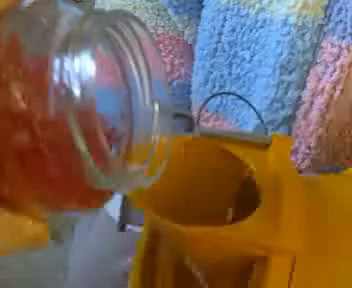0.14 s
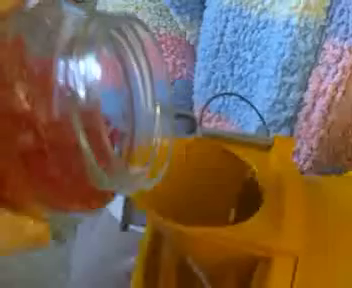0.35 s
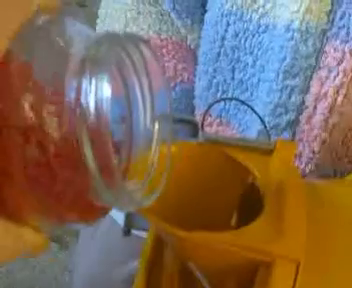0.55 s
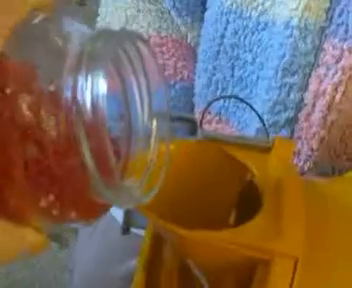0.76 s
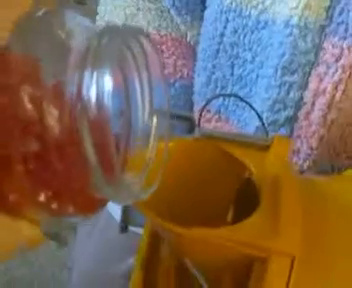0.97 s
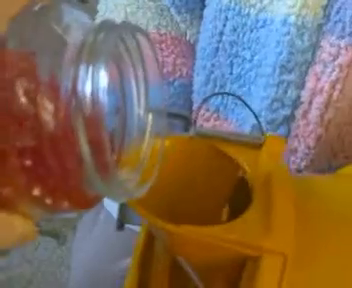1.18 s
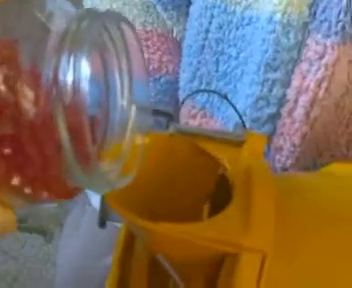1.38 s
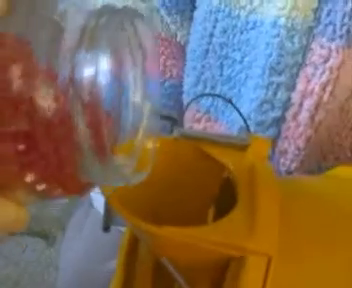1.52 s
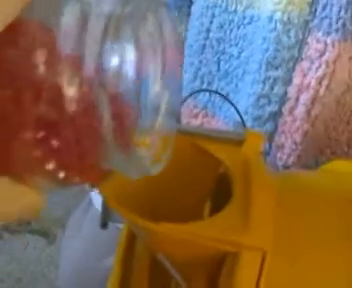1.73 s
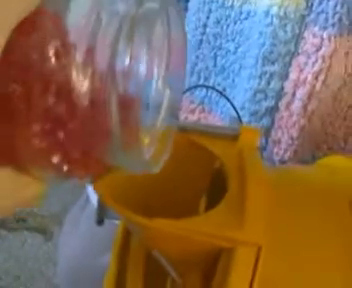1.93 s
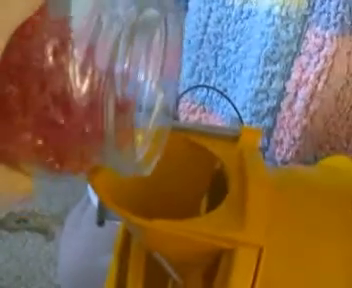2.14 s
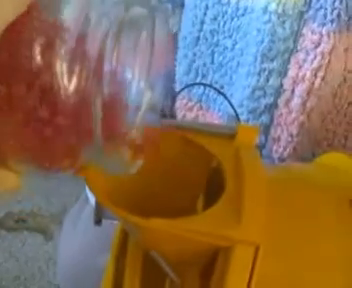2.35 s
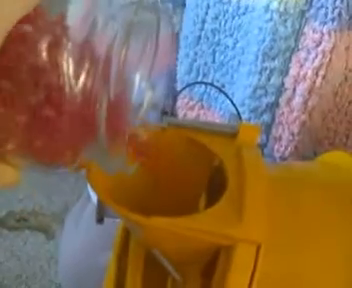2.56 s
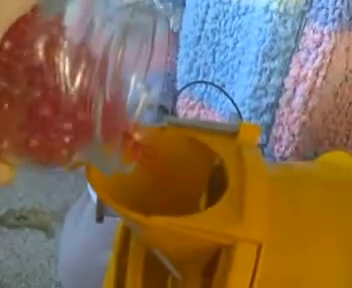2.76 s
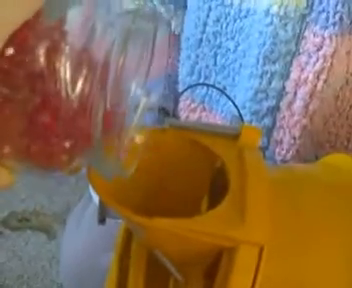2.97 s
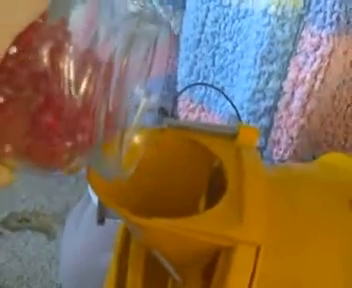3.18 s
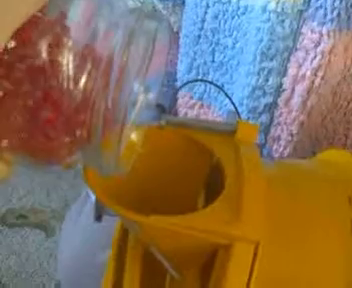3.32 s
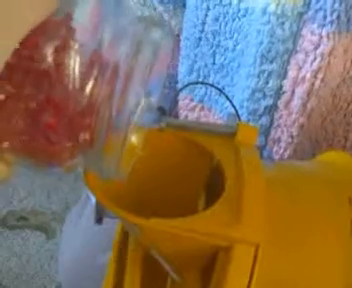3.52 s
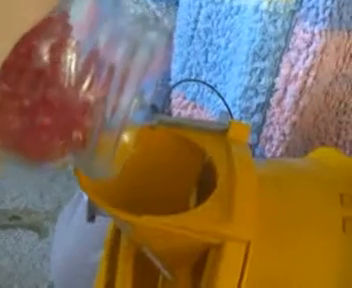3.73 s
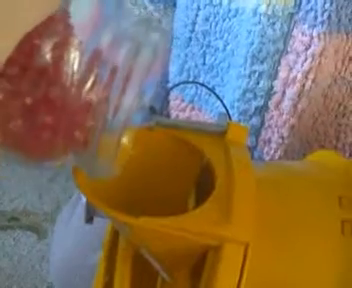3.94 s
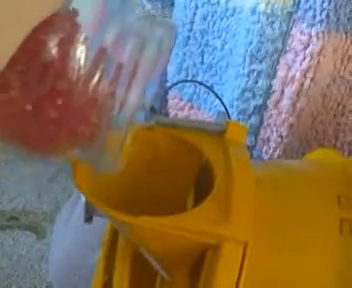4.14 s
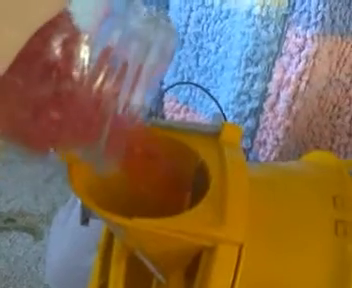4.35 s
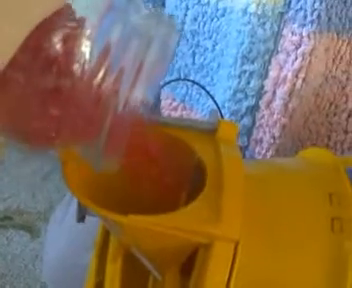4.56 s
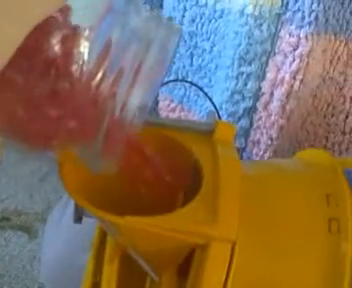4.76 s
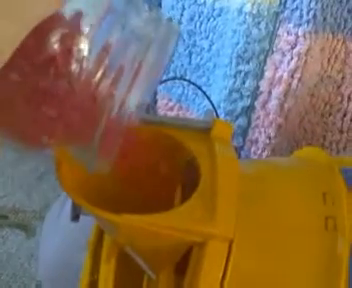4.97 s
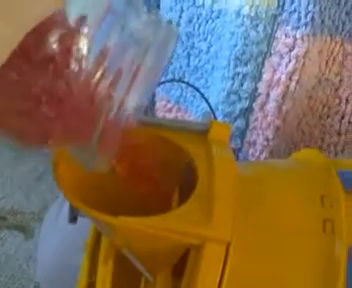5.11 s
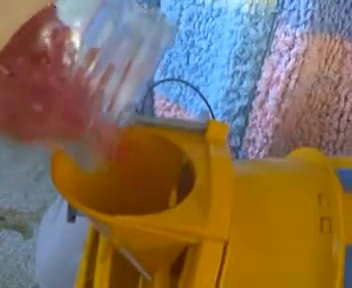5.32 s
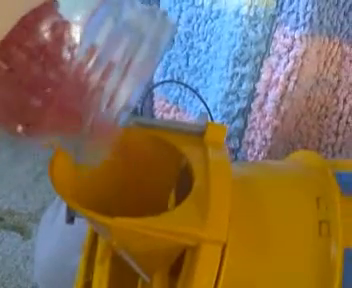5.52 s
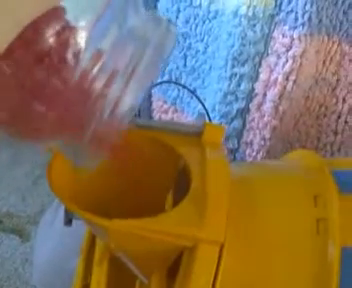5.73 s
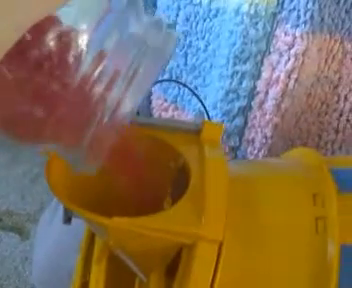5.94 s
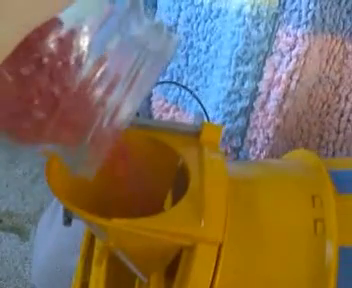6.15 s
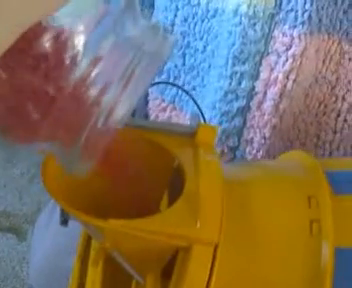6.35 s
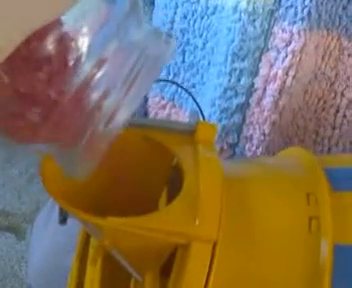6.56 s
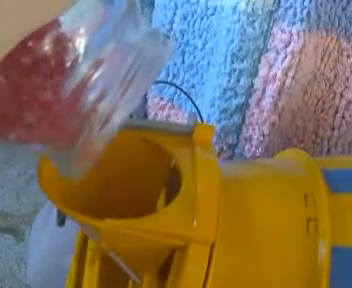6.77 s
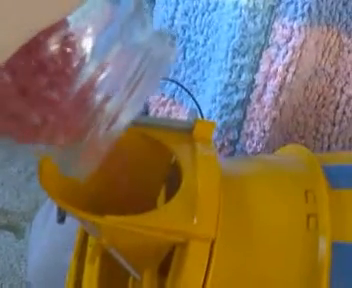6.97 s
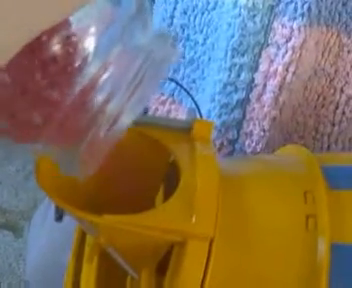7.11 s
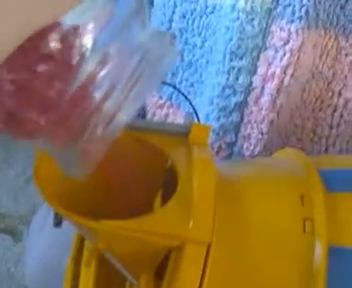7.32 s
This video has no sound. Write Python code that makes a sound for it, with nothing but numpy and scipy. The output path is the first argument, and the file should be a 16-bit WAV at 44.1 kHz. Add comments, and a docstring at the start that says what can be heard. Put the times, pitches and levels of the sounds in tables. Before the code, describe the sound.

Close to a dull, narrow-band microphone, a few beads tick in a glass jar over faint hiss. The jar's neck briefly scrapes and taps a plastic lip, ticks quicken, then beads burst loudly into the hopper. The flow thins to a trickle, a sharp tap follows, a second heavy rush clatters down, and a softer, more even third pour continues to the end.

```python
"""At a toy with a plastic hopper, small beads are poured from a tilted glass jar, close to a dull microphone.
The beads creep and tick along the glass, and the jar's neck scrapes and taps on the hopper's lip;
the beads rush down in three surges, with more creeping and a tap before the second.
Streams are random noise clicks; single hits also ring as fading sines. Little passes above 4.5 kHz,
and a fast limiter flattens the hardest hits. A faint hiss lies underneath."""
import sys
import numpy as np
from scipy import signal
from scipy.io import wavfile
from scipy.ndimage import uniform_filter1d

SR = 44100
rng = np.random.default_rng(int(sys.argv[2]) if len(sys.argv) > 2 else 0)


def wav_record(signal):
    """Record a signal, one row per channel, as 16-bit PCM in the file named by sys.argv[1]."""
    frames = np.transpose(np.atleast_2d(signal))
    bounded = np.clip(frames, -1, 1)
    # unit amplitude maps onto the largest positive 16-bit level
    quanta = np.round(bounded * 32767).astype(np.int16)
    wavfile.write(sys.argv[1], SR, quanta)


N = 325899
TIME = np.arange(N) / SR  # seconds

# Beads streaming into the hopper: one curve for each of three surges.
# Each row: time in seconds, flow in dB.
POUR = [
    [(2.5, -34), (2.54, -14), (2.66, -18.5), (2.72, -10), (3.36, -16.5), (3.5, -24.5), (3.72, -26.5),
     (3.83, -32.5), (4.11, -36), (4.2, -63)],
    [(4.23, -34), (4.31, -33.5), (4.35, -15), (4.6, -8), (4.7, -12), (5.35, -13.5), (5.44, -26),
     (5.53, -22.5), (5.8, -30)],
    [(5.8, -27.5), (5.92, -23.5), (5.98, -18.5), (6.16, -18), (6.29, -14.5), (6.64, -17), (6.77, -23.5),
     (7.05, -23.5), (7.18, -20.5), (7.39, -20)],
]
# Colour of beads rattling on each other. Each row: frequency in Hz, filter gain in dB.
RATTLE = [(40, -48), (400, -40.5), (1300, -22), (2120, -10.5), (2350, -2), (2650, -2), (3000, -4),
          (3300, -0.5), (3600, -4.5), (3800, -11.5), (4000, -21.5), (4300, -27), (4700, -34.5)]
# Colour of the hopper's drumming plastic wall. Each row: frequency in Hz, filter gain in dB.
WALL = [(40, -29.5), (120, -28), (420, -11), (750, -5), (1150, -2.5), (1500, 4.5), (1800, 0.5), (2100, 3),
        (2600, -40.5), (4500, -30)]


def amp(db):
    """Turns decibels into a gain."""
    return 10 ** (np.asarray(db) / 20)


def unit(x):
    """Scales a sound to an average strength (rms) of 1."""
    return x / np.sqrt(np.mean(x ** 2) + 1e-20)


def steady(x, size=1500):
    """Evens out the strength over a few hundredths of a second; single clicks still stand out."""
    power = uniform_filter1d(uniform_filter1d(x ** 2, size), size)
    return x / np.sqrt(abs(power) + 1e-12)


def level(s, db):
    """Gain along a dB curve, practically silent outside it."""
    return amp(np.interp(TIME, s, db, left=-140, right=-140))


def add(mix, s, sound):
    """Mixes a sound in at a time in seconds."""
    part = mix[max(round(s * SR), 0):][:len(sound)]
    part += sound[:len(part)]


def colour(x, points, size=4096):
    """Filters with the given spectrum; the response starts at once and never before its cause."""
    hz, db = np.transpose(points)
    bin_hz = abs(np.fft.fftfreq(size, 1 / SR))
    log_gain = np.log(amp(np.interp(np.log(bin_hz + 1), np.log(hz), db)))
    # the Hilbert transform finds the phase that packs the energy at the start
    spectrum = np.exp(np.conj(signal.hilbert(log_gain)))
    response = np.fft.ifft(spectrum).real[:size // 2]
    return signal.fftconvolve(x, response)[:len(x)]


def resonate(x, hz, width):
    """A resonance of gain 1, with pitch and width in Hz; the pitch may be a curve."""
    turn = np.exp(2j * np.pi * np.cumsum(hz * np.ones(len(x))) / SR)
    r = np.exp(-np.pi * width / SR)
    # shift the pitch down to 0 Hz, smooth, and shift back up
    smooth = signal.lfilter([1 - r], [1, -r], x / turn + 1e-18)
    return 2 * (turn * smooth).real


def low_pass(x, hz, size):
    """Steeply removes what lies above a frequency."""
    taps = signal.firwin(size, hz, window=("kaiser", 9), fs=SR)
    return signal.oaconvolve(x, taps, "same")


def collisions(per_s, spread_db, contact_s, wet_db, t60, ring_db=0, ring_s=0.0013, count=64, size=2000):
    """Random clicks, mostly small and a few large; every spot struck has its own pitch and reflections."""
    t = np.arange(size) / SR
    shapes = []
    for hz in np.linspace(2250, 3650, count):
        contact = rng.standard_normal(size) * np.exp(-t / contact_s)
        ring = np.sin(2 * np.pi * hz * t) * np.exp(-t / ring_s) * (1 - np.exp(-t / contact_s))
        walls = rng.standard_normal(size) * 1e-3 ** (t / t60)  # falls by 60 dB in t60 seconds
        shapes.append(unit(contact) + amp(ring_db) * unit(ring) + amp(wet_db) * unit(walls))
    out = np.zeros(N)
    for i in np.flatnonzero(rng.random(N) < per_s / SR):
        strength = amp(spread_db * min(rng.exponential(1), 4)) * rng.choice([-1, 1])
        add(out, i / SR, strength * shapes[rng.integers(count)])
    return out


def echoes(x, wet_db, t60):
    """Adds dense reflections from walls close by to one short sound."""
    t = np.arange(len(x)) / SR
    tail = rng.standard_normal(len(x)) * amp(-60 * t / t60) * (t > 0.003)
    tail = tail / np.linalg.norm(tail)
    return x + amp(wet_db) * signal.fftconvolve(x, tail)[:len(x)]


def stray(start, end, per_s, spread_db, count=400):
    """Chance hits, one somewhere in each slot of time: (seconds, dB off the usual strength, pitch in Hz)."""
    place, strength, pitch = rng.random((count, 3)).T
    s = start + (np.arange(count) + place) / per_s
    rows = np.column_stack([s, spread_db * (2 * strength - 1), 2550 + 750 * pitch])
    return rows[s < end]


def wobble(rate_hz, count=30):
    """Slow random wavering of rms 1: sines with random starts, none faster than the given rate."""
    hz, phase = np.geomspace(rate_hz / 4, rate_hz, count), rng.random(count)
    t = TIME[::128]  # so slow a curve needs few points
    waves = np.sin(2 * np.pi * (np.outer(t, hz) + phase))
    return np.interp(TIME, t, unit(waves.sum(1)))


def background_hiss(hiss_db=-69.5):
    """Faint steady hiss: noise filtered to a fixed colour."""
    # Colour of the hiss. Each row: frequency in Hz, filter gain in dB.
    hiss_colour = [(30, -19), (150, -9.5), (450, -8), (720, 1), (1200, -3.5), (2000, 2), (2700, 1),
                   (3500, -1.5), (3900, -12), (4600, -34.5)]
    return amp(hiss_db) * unit(colour(rng.standard_normal(N), hiss_colour))


def jar(creep_db=-1.5, stray_db=1.5, follow=0.84, ring_hz=3520, swell_s=0.00074, tick=0.32, size=2000):
    """Beads roll over each other and tick on the glass, which rings for a few milliseconds."""
    # Beads creeping along the glass, in three spells.
    # Each row: time in seconds, level in dB (before creep_db, or stray_db for the chance knocks).
    creep = [
        [(0.275, -68), (0.286, -45), (0.88, -54), (1.0, -65.5), (1.42, -72), (1.6, -85)],
        [(1.98, -71), (2.11, -66), (2.14, -46), (2.19, -33), (2.36, -22.5), (2.53, -22.5)],
        [(4.05, -41), (4.12, -40), (4.32, -32)],
    ]
    # Knocks of single beads that stand out. Each row: start in seconds, peak level in dB before echoes.
    glass_knocks = [(0.2866, -28), (0.296, -25), (0.3336, -30.5), (0.4323, -37), (0.7868, -37.5),
                    (0.8551, -43), (0.8964, -40), (0.9667, -44), (1.0092, -47), (1.1138, -34.5),
                    (1.2497, -49), (1.3676, -51), (1.4052, -50), (2.1566, -20), (2.1904, -19.5),
                    (2.3247, -9.5), (2.3587, -8.5), (2.4125, -7.5), (2.461, -8.5), (2.4751, -6.5)]
    # Colour of beads on glass. Each row: frequency in Hz, filter gain in dB.
    glass = [(40, -47), (250, -41.5), (520, -32.5), (720, -24), (1050, -31.5), (1650, -24.5), (2200, -20),
             (2900, -21.5), (3300, -2), (3600, 0.5), (3780, -8), (3980, -30.5), (4350, -17.5),
             (4700, -49.5)]

    flow = sum(level(*np.transpose(rows)) for rows in creep)
    clicks = collisions(per_s=650, spread_db=1.5, contact_s=0.0033, wet_db=-7.0, t60=0.058, ring_db=-30.5)
    out = amp(creep_db) * flow * steady(colour(clicks, glass))

    # small chance knocks follow the creeping level
    knocks = list(glass_knocks)
    for s, db, _ in stray(creep[0][0][0], creep[-1][-1][0], per_s=24, spread_db=8):
        flow_db = 20 * np.log10(np.interp(s, TIME, flow))
        knocks.append((s, follow * flow_db + stray_db + db))

    t = np.arange(size) / SR
    ring = np.sin(2 * np.pi * ring_hz * t) * (t / swell_s) ** 2 * np.exp(-t / swell_s)
    for s, db in knocks:
        noise = rng.standard_normal(size) * np.exp(-t / swell_s)
        knock = unit(ring) + tick * unit(colour(noise, glass))
        add(out, s, amp(db) * echoes(knock / abs(knock).max(), wet_db=-5, t60=0.061))
    return out


def lip_taps(size=2500):
    """The jar's neck taps the hopper's lip, which answers with a few short fading tones."""
    # Each row: start in seconds, peak level in dB before echoes.
    taps = [(1.035, -45), (1.8249, -17.5), (4.2223, -5.5)]
    # What the lip rings with. Each row: frequency in Hz, level in dB before colouring,
    # time to fade by 60 dB in seconds.
    lip_modes = [(2120, -7.5, 0.04), (2480, -6.5, 0.015), (3030, 4.5, 0.0056)]

    t = np.arange(size) / SR
    tap = sum(amp(db - 60 * t / t60) * np.sin(2 * np.pi * hz * t) for hz, db, t60 in lip_modes)
    # a small part radiates little bass
    tap = colour(tap, [(200, -42), (1400, -34), (2000, -0.5), (3500, -0.5), (4400, -33)])
    out = np.zeros(N)
    for s, db in taps:
        add(out, s, amp(db) * echoes(tap / abs(tap).max(), wet_db=-10, t60=0.13))
    return out


def lip_scrape(ring_db=-3, ring_width_hz=480, grit_db=-2):
    """The neck slides over the plastic lip: many tiny slips excite a resonance that moves in pitch."""
    # Each row: time in seconds, level in dB before ring_db and grit_db, moving resonance in Hz.
    scrape = [(1.68, -72, 1450), (1.71, -54, 1530), (1.732, -37.5, 1610), (1.752, -38.5, 1690),
              (1.79, -41, 1800), (1.815, -50.5, 1870), (1.84, -49, 1980), (1.87, -61, 1970),
              (1.93, -70, 1990)]
    # Colour of the gritty part. Each row: frequency in Hz, filter gain in dB.
    scrape_colour = [(100, -38), (550, -31.5), (850, -10), (1150, -24), (2400, -12.5), (2850, -7),
                     (3200, -1), (3550, -5), (3900, -30), (4600, -36.5)]

    s, db, hz = np.transpose(scrape)
    slips = collisions(per_s=4000, spread_db=2, contact_s=0.0005, wet_db=-12, t60=0.06, ring_db=-22)
    pitch = np.interp(TIME, s, hz)
    # two resonances in a row, each of this width
    ring = resonate(resonate(slips, pitch, ring_width_hz), pitch, ring_width_hz)
    grit = colour(slips, scrape_colour)
    return level(s, db) * (amp(ring_db) * steady(ring) + amp(grit_db) * steady(grit))


def settle(time_s, first_db, later_db, settle_s):
    """A level in dB that settles from its first value to its later value."""
    return later_db + (first_db - later_db) * np.exp(-(time_s / settle_s) ** 2)


def stream(drum_settle_s=0.59, bright_settle_s=0.19):
    """Flow, drumming, brightness in dB: two surges start drumming and bright and settle; the third is even."""
    # How each surge sounds. Each row: drumming on the wall at first in dB, drumming later in dB,
    # brightness at first in dB, brightness later in dB. All before wavering is added.
    surges = [(-12, -23.5, 12, -3), (-12.5, -21, 11.5, -2), (-24, -25, 0.5, 2)]

    flow_db, drum_db, bright_db = np.full((3, N), -140.)
    for curve, (drum_first, drum_later, bright_first, bright_later) in zip(POUR, surges):
        s, db = np.transpose(curve)
        since = TIME >= s[0]
        age = TIME[since] - s[0]
        flow_db[since] = np.interp(TIME[since], s, db)
        drum_db[since] = settle(age, drum_first, drum_later, drum_settle_s)
        bright_db[since] = settle(age, bright_first, bright_later, bright_settle_s)
    return flow_db, drum_db, bright_db


def clumps(flow_db, clump_db=-3.5, follow=0.53):
    """Lists all hard landings: those that stand out, and chance ones that grow with the flow."""
    # Clumps of beads that stand out. Each row: start in seconds, peak level in dB, pitch in Hz.
    hits = list([(2.5226, -2.5, 3130), (2.5638, -2, 2980), (2.5757, 5, 3100), (2.6146, 1, 3160),
                 (2.646, -0.2, 2960), (2.6844, 0.5, 3200), (2.7407, 1, 2690), (2.7513, 2, 2480),
                 (2.7786, 2, 2950), (2.8537, 2.5, 2580), (2.9124, 2.5, 2760), (2.9668, -3, 2870),
                 (3.0034, -5, 2640), (3.0371, -4, 3190), (3.0943, -5, 2500), (3.1599, -0.5, 2770),
                 (3.2203, -2, 2840), (3.3142, -5, 3500), (3.3525, -6, 2970), (3.3972, -3, 2830),
                 (3.6424, -11.5, 2360), (3.786, -14.5, 3410), (3.9511, -16.5, 3360), (3.9784, -12.5, 3260),
                 (4.1757, -23.5, 3760), (4.2726, -5.5, 3250), (4.3231, 0, 3550), (4.3348, -4, 3150),
                 (4.3801, 1, 3170), (4.4113, 2, 3290), (4.4488, -0.5, 3470), (4.4778, -0.5, 3080),
                 (4.5647, -1, 2820), (4.6489, -3.5, 2940), (4.7175, -1, 3155), (4.7416, 3, 2990),
                 (4.7976, -5, 2620), (4.9173, -6.5, 2640), (4.9501, -3.5, 2850), (4.9608, -6, 3085),
                 (5.0492, -4, 2950), (5.1012, -6.5, 2840), (5.2564, -3, 2950), (5.2789, -4, 3190),
                 (5.3166, -7, 2800), (5.5024, -7, 2730), (5.5132, -12.5, 2990), (5.8948, -15, 2580),
                 (5.9429, -11, 2990), (5.9925, -6, 3320), (6.1673, -5.5, 2960), (6.3859, -5, 3370),
                 (6.3971, -5.5, 2592), (6.5005, -2, 3200), (6.7175, -8.5, 2790), (7.1577, -11, 2860),
                 (7.2288, -12, 3160), (7.3068, -12, 3010), (7.3281, -3, 3386), (7.3353, -2.5, 2510)])
    for s, db, hz in stray(POUR[0][0][0], TIME[-1], per_s=14, spread_db=0):
        hits.append((s, clump_db + follow * np.interp(s, TIME, flow_db) + db, hz))
    return hits


def clumping(hits, gap_db=-3.0, lead_s=0.0075, gap_s=0.0094, swell_db=1.5, lag_s=0.0064, swell_s=0.0093):
    """Beads leave the jar in clumps: the stream thins just before each landing and thickens behind it."""
    t = np.arange(-0.05, 0.05, 1 / SR)
    thin, thick = np.zeros(N), np.zeros(N)
    for s, _, _ in hits:
        add(thin, s + t[0], np.exp(-((t + lead_s) / gap_s) ** 2))
        add(thick, s + t[0], np.exp(-((t - lag_s) / swell_s) ** 2))
    return amp(gap_db * np.minimum(thin, 1) + swell_db * np.minimum(thick, 1))


def landings(hits, drum_db, ring_s=0.0015, rise_s=0.00063, chatter=0.61, chatter_s=0.006,
             gather_s=0.001, thud_db=-2, size=2000):
    """A hard landing: a brief ring at its own pitch, the chatter of the beads it hits, a thud in the wall."""
    t, out = np.arange(size) / SR, np.zeros(N)
    burst = np.exp(-t / chatter_s) * (1 - np.exp(-t / gather_s))
    for s, db, hz in hits:
        beads, wall = burst * rng.standard_normal((2, size))
        ring = np.sin(2 * np.pi * hz * t) * np.exp(-t / ring_s) * (1 - np.exp(-t / rise_s))
        thud = amp(thud_db + np.interp(s, TIME, drum_db))  # strong where the wall drums
        hit = unit(colour(ring, RATTLE))
        hit = hit + chatter * unit(colour(beads, RATTLE))
        hit = hit + thud * unit(colour(wall, WALL))
        hit = echoes(hit, wet_db=-7.5, t60=0.069)
        add(out, s, amp(db) * hit / abs(hit).max())
    return out


def hopper(rattle_db=-0.5, rumble_db=-4, bright_hz=3450, bright_width_hz=600,
           wander_hz=17, drum_wander_db=1.5, bright_wander_db=2.5):
    """The stream rattles and drums on the hollow plastic, with a low rumble that swells with heavy flow."""
    # Resonances of the hopper. Each row: frequency in Hz, width in Hz, level in dB against the direct click.
    hopper_modes = [(2450, 55, -7.5), (2730, 20, -1.5), (2900, 40, -7.5), (3094, 90, -5.5), (3226, 24, -4)]
    # Colour of the low rumble. Each row: frequency in Hz, filter gain in dB.
    rumble_colour = [(25, -24), (65, -5), (120, -2), (220, -1), (420, 1.5), (800, -8), (2500, -37)]

    flow_db, drum_db, bright_db = stream()
    # the drumming and the brightness waver
    drum_db = drum_db + drum_wander_db * wobble(wander_hz)
    bright_db = bright_db + bright_wander_db * wobble(wander_hz)
    hits = clumps(flow_db)
    flow = amp(flow_db) * clumping(hits)

    clicks = collisions(per_s=870, spread_db=2.0, contact_s=0.00082, wet_db=0.0, t60=0.05,
                        ring_db=-8, ring_s=0.009)
    clicks = clicks + sum(amp(db) * resonate(clicks, hz, width) for hz, width, db in hopper_modes)
    # a treble boost or cut that follows the brightness curve
    clicks = clicks + (amp(bright_db) - 1) * resonate(clicks, bright_hz, bright_width_hz)
    rattle = amp(rattle_db) * steady(colour(clicks, RATTLE))

    blows = collisions(per_s=550, spread_db=2.5, contact_s=0.0018, wet_db=-2.0, t60=0.066, ring_db=-30)
    wall = steady(colour(blows, WALL))
    # flow multiplies the rumble twice, so in dB it grows twice as fast as the rest
    rumble = amp(rumble_db) * flow * steady(colour(blows, rumble_colour))
    return flow * (rattle + amp(drum_db) * (wall + rumble)) + landings(hits, drum_db)


def scene():
    """Hiss, jar, lip and hopper together, as one channel."""
    mix = background_hiss() + jar() + lip_taps() + lip_scrape() + hopper()
    return mix[None]


def record(dry, band_hz=4520, ceiling=0.73, release_db_per_s=11000, edge_hz=15950):
    """A narrow band, then a limiter that snaps down on each peak: the flattened crests spit treble."""
    x = low_pass(dry[0], band_hz, size=501)
    over_db = 20 * np.log10(np.maximum(abs(x) / ceiling, 1))
    # the cut grows at once and then lets go at a steady rate
    recovery = TIME * release_db_per_s
    held_db = np.maximum.accumulate(over_db + recovery) - recovery
    return low_pass(x / amp(held_db), edge_hz, size=511)[None]


dry = scene()
out = record(dry)
wav_record(out)
```